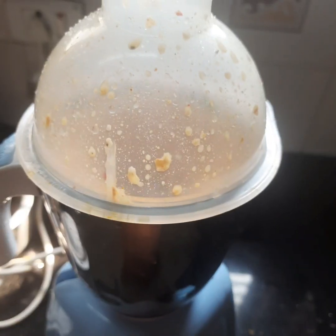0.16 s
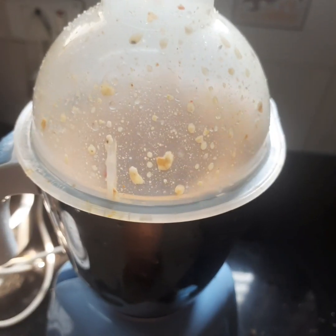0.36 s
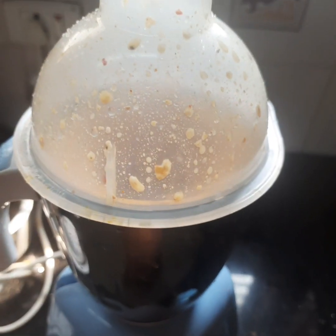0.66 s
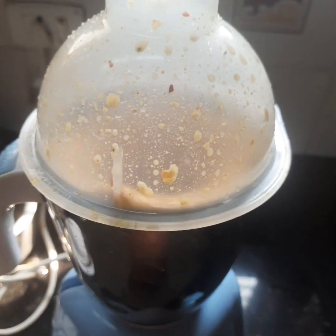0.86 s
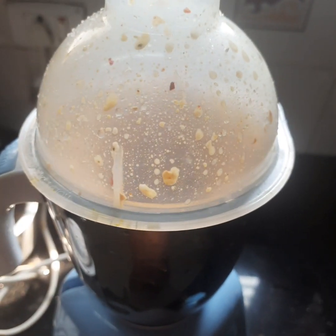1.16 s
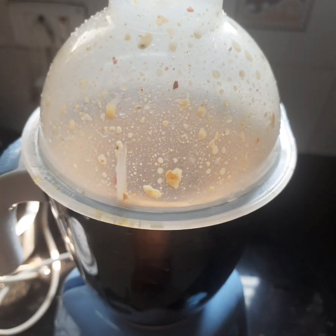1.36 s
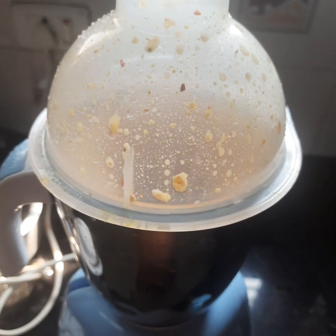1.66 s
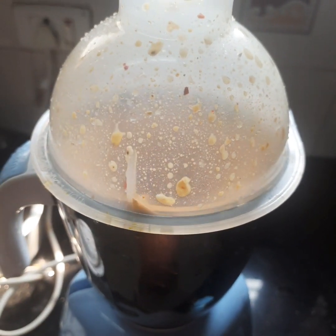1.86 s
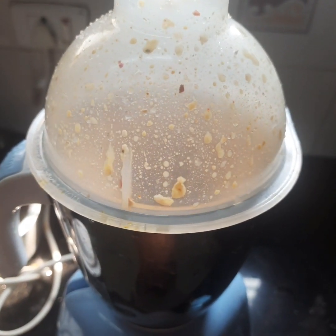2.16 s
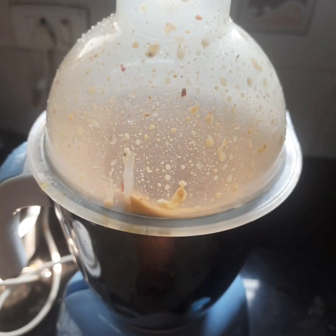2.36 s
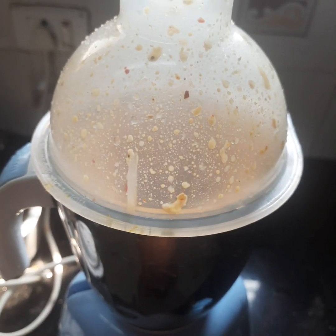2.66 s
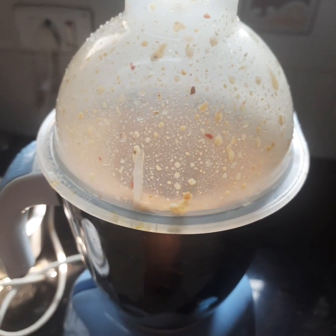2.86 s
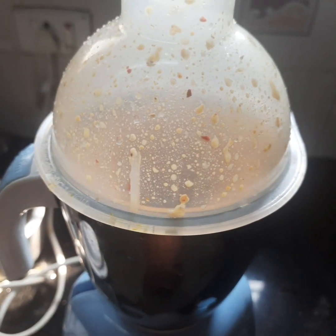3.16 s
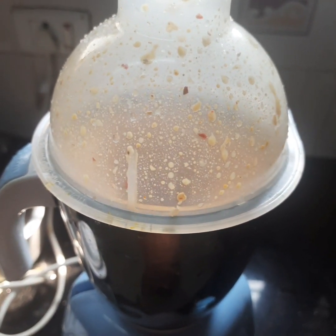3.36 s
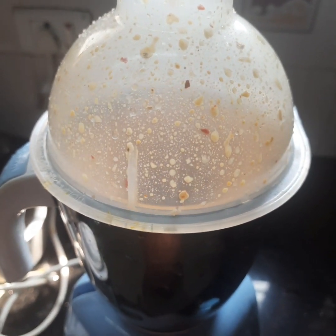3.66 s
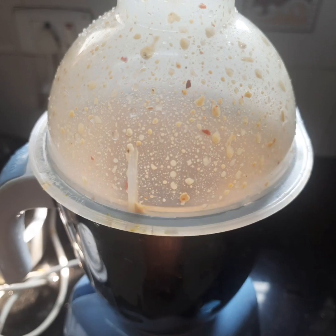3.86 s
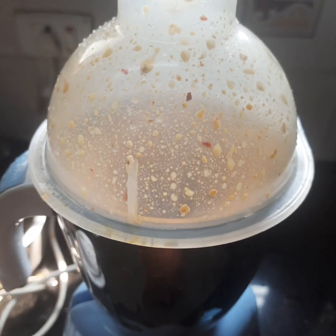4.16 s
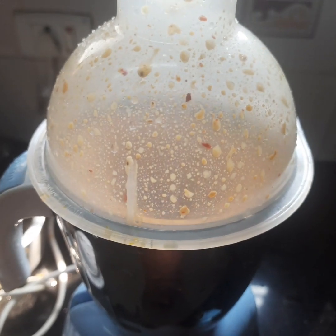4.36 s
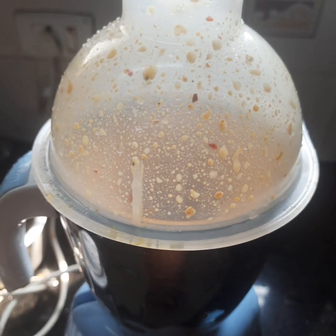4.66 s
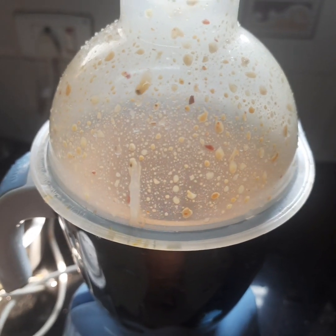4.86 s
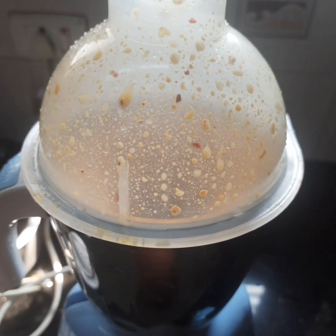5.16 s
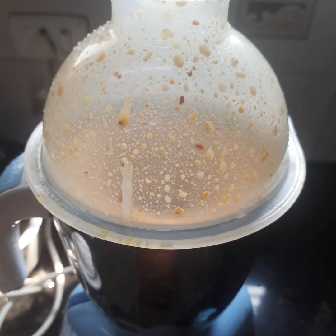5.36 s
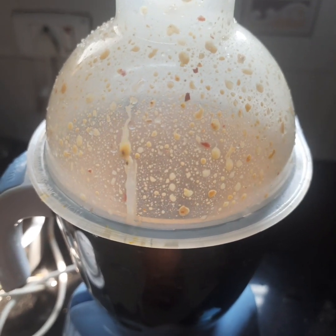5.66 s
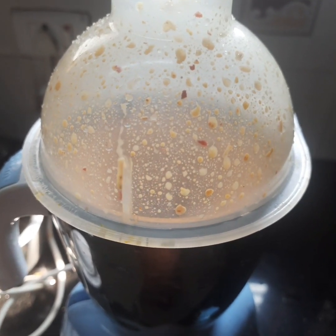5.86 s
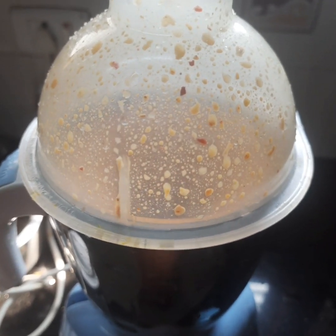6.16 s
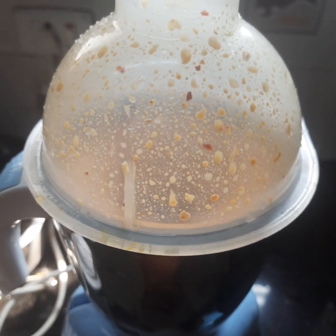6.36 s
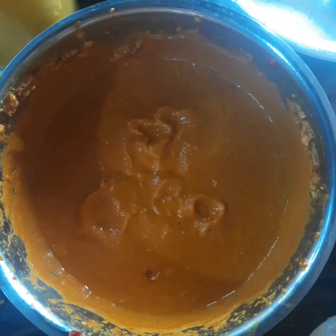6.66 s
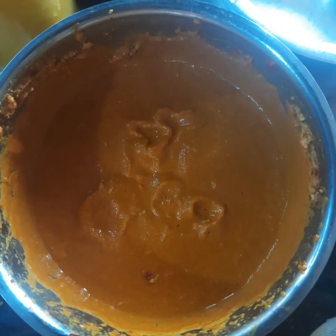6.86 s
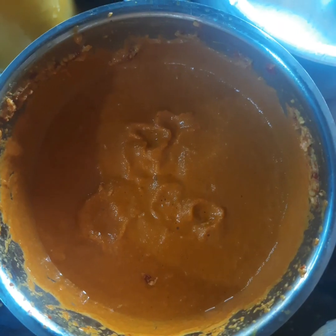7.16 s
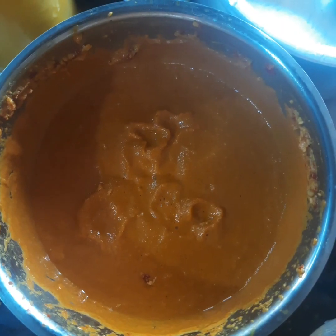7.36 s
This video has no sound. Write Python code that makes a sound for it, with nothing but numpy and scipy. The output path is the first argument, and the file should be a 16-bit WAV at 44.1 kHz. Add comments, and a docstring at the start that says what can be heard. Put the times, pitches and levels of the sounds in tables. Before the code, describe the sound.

Heard up close in a kitchen, a mixer grinder drones at an almost constant pitch, grinding wet paste with a rough metallic rush. Occasional small knocks come from the steel jar, and thin sparking ticks sit above the hum. The motor sags very slightly as the paste thickens. Near the end it stops dead with no wind-down, and only faint room air and a brief soft hiss remain.

```python
"""A mixer grinder is already running close by in a kitchen, spinning wet coconut and chilli paste.
Its unbalanced rotor hums, the paste pelts a ringing steel jar under a plastic dome, and the motor's
brushes crackle with sparks. Now and then a hard bit knocks on the wall. As the paste thickens, the
rotor slows a little and the base shudders more. Near 6.7 seconds the grinding cuts off abruptly.
After a short gap there is only the quiet kitchen and, at the very end, one faint hiss."""
import sys
import numpy as np
from scipy import signal
from scipy.fft import rfft, irfft
from scipy.io import wavfile

SR = 44100
rng = np.random.default_rng(int(sys.argv[2]) if len(sys.argv) > 2 else 0)


def store_wav(level_fs):
    """Save 16-bit WAV to argv[1]."""
    pcm = np.round(np.clip(np.atleast_2d(level_fs), -1, 1) * 32767)
    wavfile.write(sys.argv[1], SR, pcm.T.astype(np.int16))


N = 331191
TIME = np.arange(N) / SR
BINS = np.fft.rfftfreq(8192, 1 / SR)  # the frequencies, in Hz, at which filters are set


# The rotor slows as the paste thickens. Each row: time in seconds, turns per second.
ROTOR_SPEED = [(0.05, 240.2), (0.41, 239.9), (0.51, 241.8), (0.76, 241.8), (2.37, 238.9), (3.13, 239.2),
               (3.28, 237.3), (4.08, 237.7), (4.17, 236.5), (6.6, 236.1)]

def rotor_speed(wobble_turns_per_s=0.554, wobble_hz=7.26):
    """Turns per second of the rotor, jostled a little by lumps of paste."""
    return curve(ROTOR_SPEED) + wobble_turns_per_s * wander(wobble_hz)


# Tones at 1 to 4 times the rotor's speed. "Sag" is the speed lost to the load, in turns per second.
# Each row: sag where the tone is loudest, change of sag that takes off 3 dB, top level in dB,
# left minus right in dB, left side's lead in radians, unsteadiness from 0 to 1.
HUM_TONES = [(1, 20, -16.5, -4, 0.24, .03), (8.9, 8.3, -36, 6, 1.14, 0.32), (2.8, 2, -38, 5.5, 0.85, .33),
             (6.7, 5.5, -35.5, 3, -2.5, 0.6)]
# The load's unbalance eases once a hard bit breaks up. Each row: time in seconds, hum change in dB.
UNBALANCE_DB = [(0, 0.5), (3.18, 0.16), (3.3, -0.66), (6.6, -0.05)]

def rotor_hum(turns, sag, slosh_hz=9):
    """The unbalanced rotor hums; its tones swell where the housing resonates, and paste shakes them."""
    out = np.zeros((2, N))
    for k, (best_sag, width, db, pan_db, lead, depth) in enumerate(HUM_TONES, 1):
        tone = np.exp(2j * np.pi * (k * turns + rng.random()))
        tone *= 1 + depth * (wander(slosh_hz) + 1j * wander(slosh_hz))
        sides = unit(amp([pan_db / 2, -pan_db / 2])) * np.exp([0, -1j * lead])
        level = amp(db + curve(UNBALANCE_DB)) / np.sqrt(1 + ((sag - best_sag) / width) ** 2)
        out += level * np.sqrt(2 / (1 + 2 * depth ** 2)) * (sides[:, None] * tone).real
    return out


def grinding(turns, level_db=-28.5, coarse_db=2.5, settle_s=0.24, grit=0.82, blade_db=-18):
    """Grit pelts the jar over the rush of paste, pulsing with each turn; the blades add a buzz."""
    pelting = clicks(per_s=2500, spread_db=1.0)
    rush = [unit(grit * scatter(pelting, decay_s=.003) + noise()) for _ in range(2)]
    shaken = turns + 0.015 * wander(25)
    buzz = unit(sum(np.cos(2 * np.pi * (k * shaken + rng.random())) for k in range(5, 14)))
    throb = 1 + 0.065 * np.cos(2 * np.pi * turns)
    surge = amp(0.8 * wander(29))
    sound = jar(two_sides(rush[0] + amp(blade_db) * buzz, rush[1]) * throb * surge)
    sound /= band_rms(sound, 800, 3400)
    # it starts louder and settles as coarse bits break up
    return sound * amp(level_db + coarse_db * np.exp(-TIME / settle_s))


# The overall tone of the churning paste. Each row: frequency in Hz, relative level in dB.
CHURN_TONE = [(25, -96), (60, -80.5), (130, -80.5), (230, -63), (300, -67), (450, -71), (650, -75.5),
              (850, -71.5), (1300, -69.5), (1900, -75), (2400, -61.5), (3000, -74), (4800, -71),
              (9000, -84.5)]
# Where jar, dome and housing ring. Each row: pitch in Hz, width in Hz, left and right strength in dB.
JAR_RINGS = [(344, 22, 2, 0.5), (405, 50, 7, 2.5), (585, 51, 13, 9.5), (664, 16, 15, 14),
             (815, 26, 12.5, 2.5), (905, 79, -1.5, 14), (935, 39, 17.5, 13), (997, 27, 10, 15),
             (1070, 42, 16.5, -10), (1177, 30, 11, 15), (1262, 65, 3.5, 13), (1360, 45, 12, -11.5),
             (1372, 49, 3.5, 14), (1450, 42, 0.5, -10.5), (1566, 65, 11.5, 10.5), (1710, 34, 14.5, -13.5),
             (1788, 56, 16, 18.5), (1904, 50.3, 16.5, 10.5), (2030, 40, 16, 19), (2130, 24, 14, 14),
             (2173, 90, 6.5, 6), (2242, 26, 3, 13.5), (2390, 22, 5, 5.5), (2593, 36, 5, 15.5),
             (2767, 57, 6, 6), (2972, 91, 14, 18.5), (3000, 31, 11.5, 5.5), (3330, 250, 7, -3),
             (3300, 36, -4, 13.5), (4200, 110, -1, -1), (4800, 200, -18, -4.5)]

def jar(drive):
    """The jar rings on top of the churning; each side hears the rings with its own strengths."""
    hz, width, *sides_db = np.transpose(JAR_RINGS)
    peaks = resonances(hz, width)
    gains = [amp(spectrum(CHURN_TONE)) * np.sqrt(1 + peaks @ amp(db) ** 2) for db in sides_db]
    return np.array([colour(x, gain) for x, gain in zip(drive, gains)])


# How alike the two sides of the churning are. Each row: frequency in Hz, likeness from 0 to 1.
LIKENESS = [(50, 0.83), (450, 0.96), (900, 0.42), (2200, 0.5), (3200, 0.56), (4500, 0.33), (8000, 0.5),
            (15000, .18)]
# How far the left side runs ahead. Each row: frequency in Hz, lead in radians.
LEFT_LEAD = [(50, 0.5), (600, -0.27), (900, -1.73), (1200, -2), (1600, -1.5), (2000, -1.55), (2220, -3),
             (2420, -1.33), (3000, 0.7), (3700, 1.45), (4800, -4.5), (6000, -1), (8500, 2.5), (10500, -7),
             (13000, -5)]

def two_sides(left, other):
    """The right side hears part of the left's sound, shifted in phase, and part of its own."""
    def passed(x, gain):
        return signal.oaconvolve(x, np.fft.fftshift(irfft(gain)))[len(BINS) - 1:][:N]
    same = spectrum(LIKENESS)
    shared = passed(left, same * np.exp(-1j * spectrum(LEFT_LEAD)))
    return np.array([left, shared + passed(other, np.sqrt(1 - same ** 2))])


# The struck wall's ring, damped by paste. Each row: pitch in Hz, width in Hz, relative level in dB.
WALL_RINGS = [(640, 250, -7.5), (920, 140, -2), (1300, 95, -6.5), (1774, 150, 1.5), (2040, 190, -3),
              (2440, 320, -3), (2980, 170, -15.5), (3465, 200, -12), (4030, 395, -10.5), (5030, 440, -11.5),
              (7600, 900, -18.5)]
# Hard bits hitting the wall. Each row: start in seconds, level in dB as if spread over 10 ms,
# centre frequency in Hz, fade time of the rattle in seconds.
HARD_BITS = [(0.04, -14.5, 2600, 0.0083), (0.042, -17, 1200, 0.0065), (0.053, -23.5, 2740, .004),
             (0.43, -26, 2420, 0.0044), (0.743, -21, 2400, 0.011), (1.029, -27, 3570, .002),
             (1.1109, -24, 2600, 0.0048), (1.2421, -28, 3600, .003), (1.674, -28, 2900, .004),
             (3.247, -17, 2000, 0.005), (3.2584, -21.5, 1700, .004), (3.525, -26, 3600, .003),
             (3.597, -21.5, 2100, 0.0048), (6.114, -27, 3200, .003)]

def knocks(rattle=0.69, body=.18, width_octaves=1.5):
    """A hard bit hits the steel wall, then rattles briefly along it."""
    out = np.zeros((2, N))
    t = np.arange(SR // 6) / SR
    ring_hz, width, ring_db = np.transpose(WALL_RINGS)
    wall = np.sqrt(resonances(ring_hz, width) @ amp(ring_db) ** 2)
    for start_s, db, hz, fade_s in HARD_BITS:
        touches = noise(len(t)) * (rng.random(len(t)) < .1)
        blow = rattle * touches * np.exp(-t / fade_s)
        blow[0] += 2  # the first hit
        focus = np.exp(-(np.log2((BINS + 1) / hz) / width_octaves) ** 2)
        blow = colour(blow, wall * (body + focus))
        ring = np.array([scatter(blow, decay_s=0.0021) for _ in range(2)])
        ring *= np.sqrt(.01 * SR) / np.linalg.norm(ring, axis=1, keepdims=True)
        start = round(start_s * SR)
        out[:, start:start + len(t)] += amp(db) * ring
    return out


# The tone of the sparks. Each row: frequency in Hz, left and right relative level in dB.
SPARK_TONE = [(2500, -105, -99.5), (5070, -83, -78), (6600, -81, -79), (7500, -74, -71), (8360, -73, -75),
              (9200, -83, -82.5), (9850, -80, -81), (10800, -76.5, -78.5), (12370, -74.5, -77.5),
              (13580, -73, -77.5), (15800, -74.5, -79)]
# The sparking waxes and wanes. Each row: time in seconds, level of the high treble in dB.
SPARK_LEVEL = [(0, -42.8), (.45, -44.5), (.75, -43), (1.35, -44), (1.65, -43), (1.9, -44.5), (2.8, -44.5),
               (3.04, -43), (3.3, -45), (4, -43), (4.25, -45), (4.55, -41.5), (4.95, -43), (6.55, -41.5)]
# The sharpest sparks. Each row: start in seconds, rough peak level in dB.
SHARP_SPARKS = [(1.5851, -20.5), (2.1784, -33), (2.2916, -24), (2.6922, -14), (3.8334, -25), (3.9674, -20),
                (4.399, -26), (4.5087, -17), (4.8529, -25), (5.3218, -33), (6.3903, -23), (6.6543, -20)]

def brushes(turns, hiss=0.97, flicker_db=1.0, flare_gain=4.2, flare_s=0.0089):
    """Carbon brushes spark on the motor's spinning contacts, a little more once and twice a turn."""
    def sparks():
        return clicks(per_s=2000, spread_db=5.3)
    def tint(pair):
        return np.array([colour(x, amp(spectrum(SPARK_TONE, k))) for k, x in enumerate(pair, 1)])
    contact = 1 + .07 * (np.cos(2 * np.pi * turns) + np.cos(4 * np.pi * turns))
    contact *= amp(flicker_db * wander(26))
    # each side hears its own sparks; some arrive smeared by the housing
    sides = [sparks() + .5 * scatter(sparks(), decay_s=0.000794) + hiss * noise() for _ in range(2)]
    crackle = tint(contact * np.array(sides))
    crackle /= band_rms(crackle, 10500, 15500)
    flashes, flare = np.zeros(N), np.ones(N)
    for start_s, db in SHARP_SPARKS:  # the crackle flares around each sharp spark
        flashes[round(start_s * SR)] = amp(db)
        flare += flare_gain * amp(db) * np.exp(-abs(TIME - start_s) / flare_s)
    snaps = tint([scatter(flashes, decay_s=.0002) for _ in range(2)])
    snaps *= flashes.max() / abs(snaps).max()
    return crackle * flare * amp(curve(SPARK_LEVEL)) + snaps


# Spells of stronger shuddering. Each row: middle in seconds, half length in seconds, level in dB.
SHUDDER_SPELLS = [(4.28, 0.099, -62), (6.625, .16, -50)]

def base_rumble(sag, unloaded_db=-75.5, db_per_sag=2.43):
    """The base shudders on its rubber feet, more as the paste thickens and in short spells."""
    feet = resonances(hz=93, width_hz=22)[:, 0]
    spells = sum(amp(db) * swell(middle_s, half_s) for middle_s, half_s, db in SHUDDER_SPELLS)
    return tinted_noise(feet) * (amp(unloaded_db + db_per_sag * sag) + spells)


# The tone of the quiet kitchen. Each row: frequency in Hz, relative level in dB.
ROOM_TONE = [(20, -29), (40, -20), (60, -2.5), (85, -17), (120, -5.5), (250, -5.5), (420, -13),
             (560, -13.5), (800, -20.5), (1300, -27.5), (2750, -32.5), (5000, -43), (8000, -43),
             (9500, -57)]

def kitchen(air_db=-58.5, apart=.45, tone_hz=538, tone_db=-69):
    """A low murmur of room air with one faint steady tone."""
    mid, side = (tinted_noise(amp(spectrum(ROOM_TONE))) for _ in range(2))
    tone = amp(tone_db) * np.sqrt(2) * np.sin(2 * np.pi * tone_hz * TIME + .6 * wander(6))
    return amp(air_db) * np.array([mid + apart * side, mid - apart * side]) + tone


# The tone of the closing hiss. Each row: frequency in Hz, relative level in dB.
HISS_TONE = [(2000, -35), (3700, -9), (4950, 0), (6700, -7), (8470, -18.5), (9320, -31), (12400, -21),
             (15500, -21)]

def faint_hiss(level_db=-64.5):
    """A soft hiss swells and fades in the quiet room."""
    sides = np.array([tinted_noise(amp(spectrum(HISS_TONE))) for _ in range(2)])
    return sides * amp(level_db) * swell(middle_s=7.415, half_s=0.075)


def amp(db):
    """Turns decibels into a gain."""
    return 10 ** (np.asarray(db) / 20)


def unit(x):
    """Scales a signal to an average (rms) size of 1."""
    return x / np.sqrt(np.mean(x ** 2) + 1e-20)


def curve(rows):
    """Joins the rows of a time table with straight lines."""
    return np.interp(TIME, *np.transpose(rows))


def swell(middle_s, half_s):
    """A smooth rise to 1 and fall back."""
    return np.exp(-((TIME - middle_s) / half_s) ** 2)


def spectrum(rows, column=1):
    """Reads one column of a frequency table at every filter frequency."""
    rows = np.array(rows)
    return np.interp(np.log(BINS + 1), np.log(rows[:, 0]), rows[:, column])


def resonances(hz, width_hz):
    """One peak over frequency for each ringing pitch."""
    return 1 / (1 + (2 * (BINS[:, None] - hz) / width_hz) ** 2)


def noise(length=N):
    """Plain white noise."""
    return rng.standard_normal(length)


def tinted_noise(gain):
    """Filtered noise of average size 1."""
    return unit(colour(noise(), gain))


def wander(hz):
    """A random drift of average size 1, moving at up to about hz."""
    f = np.fft.rfftfreq(N, 1 / SR)
    return unit(irfft(rfft(noise()) / (1 + (f / hz) ** 2), N))


def clicks(per_s, spread_db):
    """Random clicks, a few larger than the rest."""
    size = amp(spread_db * np.minimum(rng.exponential(1, N), 4.5))
    return unit(size * rng.choice([-1, 1], N) * (rng.random(N) < per_s / SR))


def colour(x, gain):
    """Filters with a gain for each frequency, ringing only after a sound, never before."""
    log_gain = np.log(np.maximum(gain / gain.max(), 1e-5))
    mirrored = np.r_[log_gain, log_gain[-2:0:-1]]
    response = np.exp(np.conj(signal.hilbert(mirrored)))
    ring = np.fft.ifft(response).real[:len(BINS)]
    return gain.max() * signal.oaconvolve(x, ring)[:len(x)]


def band_rms(x, lo_hz, hi_hz):
    """Level of the two sides' average between two frequencies."""
    f = np.fft.rfftfreq(N, 1 / SR)
    band = rfft(x.mean(0))[(f > lo_hz) & (f < hi_hz)]
    return np.sqrt(2 * np.sum(abs(band) ** 2)) / N


def scatter(x, decay_s):
    """Quick echoes from counter and tiles smear each click without changing its tone."""
    t = np.arange(2 * len(BINS) - 2) / SR
    echoes = noise(len(t)) * np.exp(-t / decay_s)
    for _ in range(6):  # make them equally strong at all frequencies, yet short
        flat = irfft(np.exp(1j * np.angle(rfft(echoes))))
        echoes = flat * np.exp(-(t / (6 * decay_s)) ** 4)
    return signal.oaconvolve(x, echoes / np.linalg.norm(echoes))[:len(x)]


def scene(unloaded_turns_per_s=242, stop_s=6.675, quiet_s=6.732):
    """The running grinder, a sudden stop, then the quiet room."""
    speed = rotor_speed()
    turns = np.cumsum(speed) / SR
    sag = unloaded_turns_per_s - speed
    grinder = rotor_hum(turns, sag) + grinding(turns) + base_rumble(sag) + knocks() + brushes(turns)
    running = np.exp(-np.maximum(TIME - stop_s, 0) / 0.0025)
    return grinder * running + kitchen() * (TIME > quiet_s) + faint_hiss()


def record(dry):
    """Rounds off the highest peaks, then cuts away the very top of the treble."""
    knee, headroom, cutoff_hz = .45, .2, 15760
    clipped = np.clip(dry, -knee, knee)
    rounded = clipped + headroom * np.tanh((dry - clipped) / headroom)
    lowpass = signal.firwin(1023, cutoff_hz, window=("kaiser", 9), fs=SR)
    return signal.oaconvolve(rounded, lowpass[None], "same")


dry = scene()
out = record(dry)
store_wav(out)
```